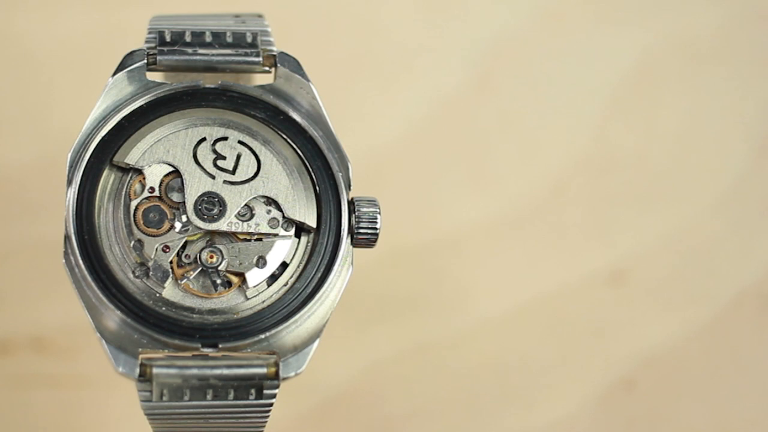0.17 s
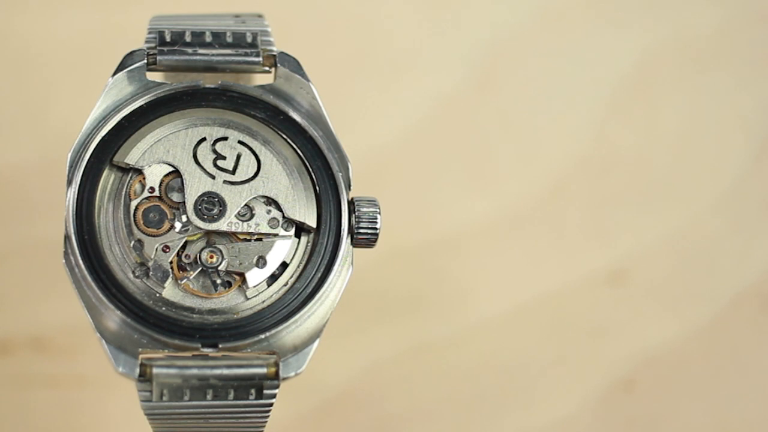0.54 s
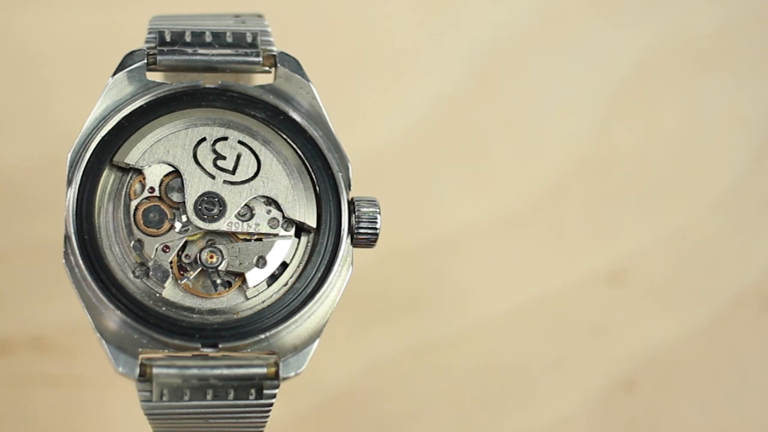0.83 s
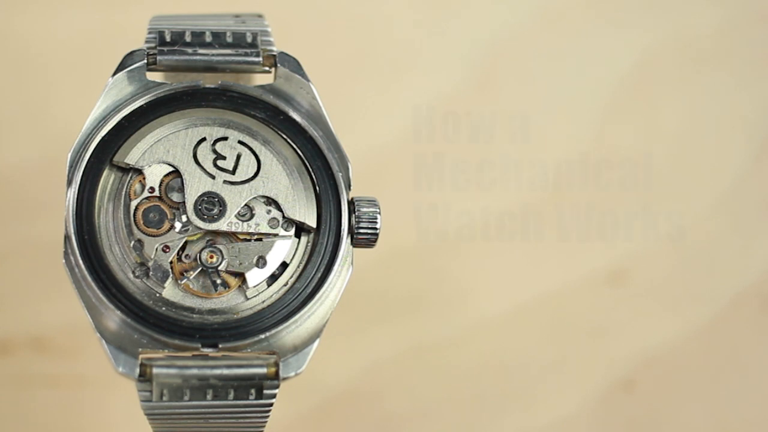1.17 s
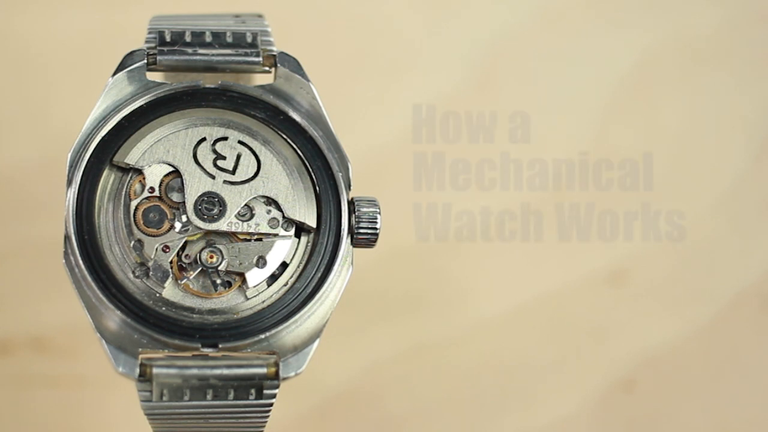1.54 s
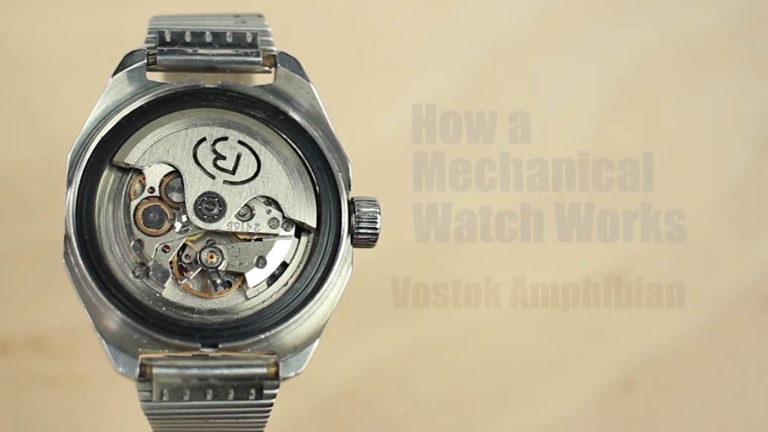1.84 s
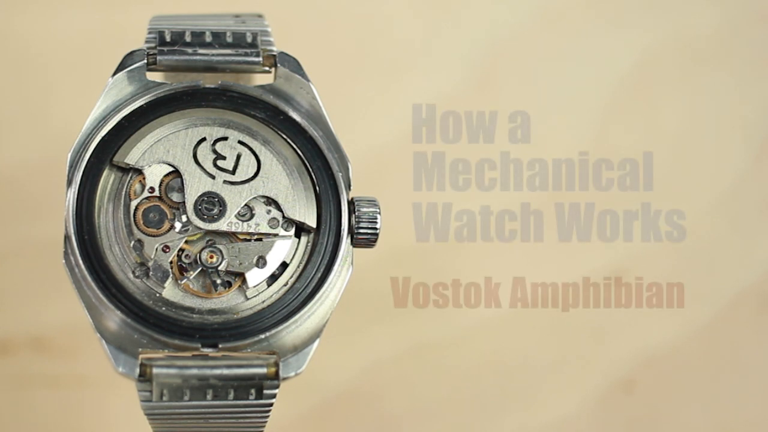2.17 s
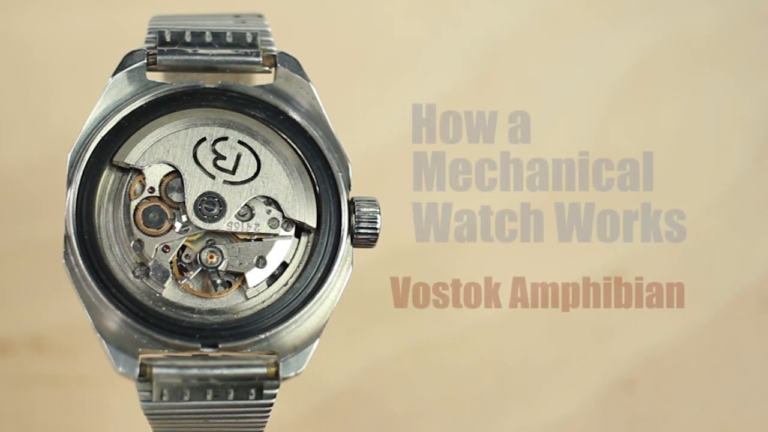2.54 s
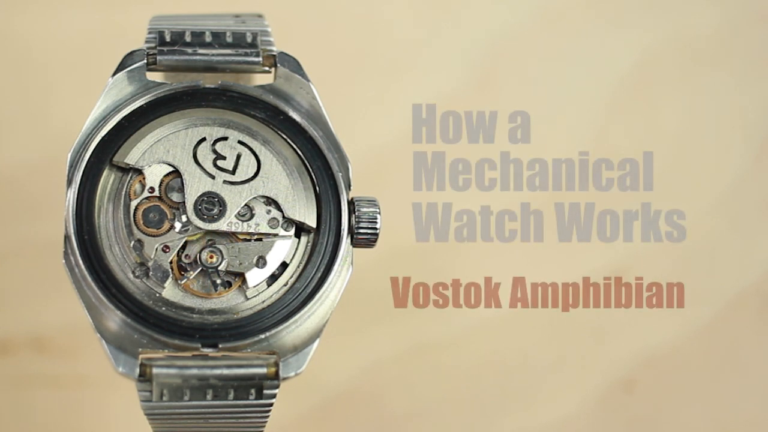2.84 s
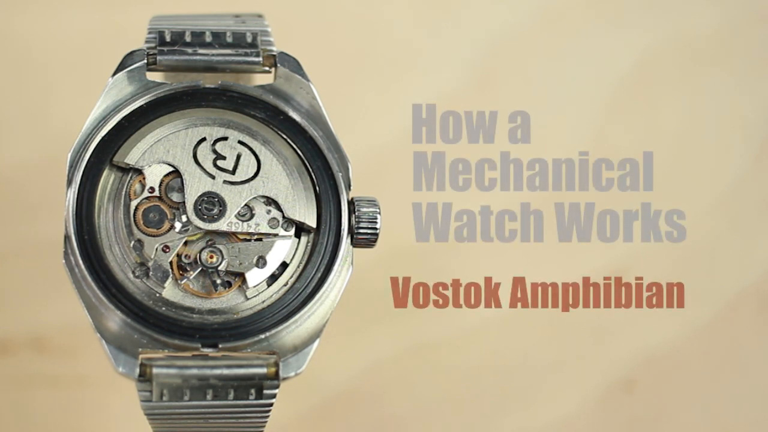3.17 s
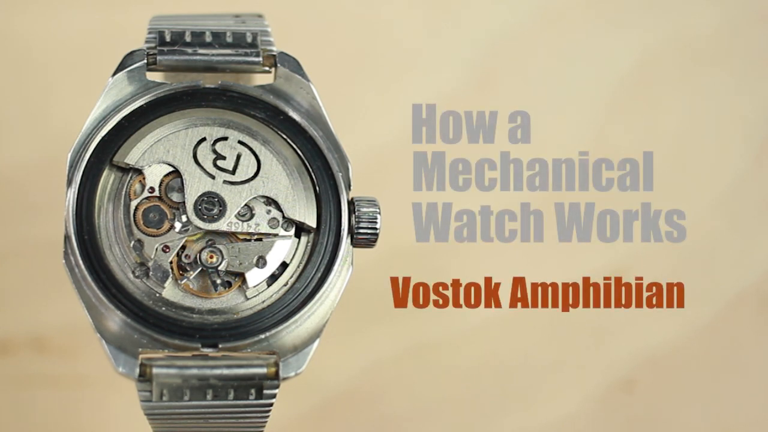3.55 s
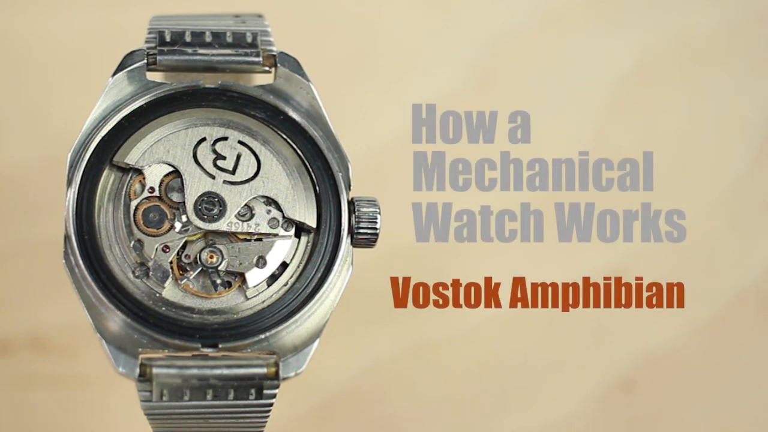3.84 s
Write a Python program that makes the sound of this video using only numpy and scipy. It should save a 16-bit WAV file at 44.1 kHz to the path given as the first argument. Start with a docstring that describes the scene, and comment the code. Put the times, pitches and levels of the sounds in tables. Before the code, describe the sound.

A mechanical wristwatch ticks about five and a half times a second, each tick a tiny light patter ending in a hard bright click; microphone right at the movement, faint hiss, small quiet room.

```python
"""Room with a short tail, microphone right at a mechanical wrist watch: 5.5 beats a second over faint hiss.
Each beat: three light escapement contacts, each a pair of mode bursts, then the hard drop, which rings
the movement and case as decaying modes, with a noise crack, a snap and a rustling tail.
After every second beat the hairspring is touched: paired modes shimmer over a band-noise rattle.
Room: convolution with fading noise. Hiss: shaped noise."""
import sys
import numpy as np
from scipy import signal
from scipy.fft import rfft, irfft
from scipy.io import wavfile

SR = 44100
rng = np.random.default_rng(int(sys.argv[2]) if len(sys.argv) > 2 else 0)


def dump(signal):
    """Clip the signal to [-1, 1] and save it as 16-bit WAV at the path in sys.argv[1]."""
    limited = np.clip(np.atleast_2d(signal).T, -1, 1)
    pcm = np.round(limited * 32767).astype(np.int16)
    wavfile.write(sys.argv[1], SR, pcm)


N = 176400

# Beats, one row each: group_1_db .. group_6_db (movement modes, low to high), light_contacts_db,
# low_ring_db, high_ring_db, then ping_hz, ping_db for each clear ping of the case
BEATS = [(-35, -26, -37, -17, -22, -24, -26, -41.5, -33, 3073, -44.5, 3779, -56.5, 5050.5, -51.5),
         (-24, -52, -30, -23, -18, -27, -33.5, -36.5, -42.5, 3057, -47, 3829, -42.5),
         (-31.5, -22.5, -38, -29, -23.5, -24, -32, -44, -28, 3064, -67, 5781, -58),
         (-48, -64, -40, -34.5, -27, -40, -39.5, -54, -41, 2537, -58, 3038, -58.5),
         (-47, -25.5, -33.5, -22, -9, -32.5, -29, -55.5, -29, 3098.5, -50, 4596.5, -46.5, 5134, -38.5),
         (-13.5, -24, -19.5, -12.5, -23, -41.5, -27.5, -25, -38.5, 2657, -39.5, 5211.5, -38.5, 5833.5, -43.5),
         (-41, -33.5, -26.5, -28, -16.5, -28, -30.5, -42, -30, 2150, -54, 1446, -63),
         (-37.5, -62, -35, -26, -24, -49, -34, -53, -29, 2850, -48, 3160, -61),
         (-38, -21, -20.5, -13.5, -13, -17.5, -23.5, -39.5, -21, 1928.5, -42, 2966, -44.5, 4550.5, -41.5, 5123.5, -34, 3757, -47),
         (-41, -22, -25.5, -24.5, -13.5, -17.5, -38, -47, -33, 2547, -42, 3098, -59.5, 5202, -45, 5850, -42),
         (-38.5, -35, -31, -16.4, -18, -28, -31, -45, -26, 2060, -52.5, 4706, -40.5, 5178, -58),
         (-50, -37, -24, -18, -19, -18.5, -33, -44.5, -26, 2805, -44, 5038, -62),
         (-38, -16, -33, -14.5, -9.5, -21, -26.5, -41.5, -24.5, 3752, -40, 5223, -36, 1381, -62, 5881.5, -54, 2053, -68),
         (-16.5, -21, -22, -15, -18, -20, -29, -23.5, -47, 2483, -55, 2915.5, -36.5, 5263, -40.5, 5720, -39.5),
         (-67, -20, -24, -28, -17, -20.5, -32, -46, -19, 5199, -53),
         (-24, -41, -18.5, -18.5, -19.5, -24, -32, -53, -29.5, 2082, -59, 5264, -62),
         (-31, -21.5, -22, -13.5, -8, -12.5, -27, -35.5, -20.5, 3720.5, -46, 4549.5, -47, 2998, -53.5, 5106.5, -35.5, 2090, -59.5),
         (-16.5, -24, -18, -19, -19, -27.5, -30, -23.5, -26, 2190, -52.5, 2782, -54, 5115, -37, 5793, -36),
         (-25.5, -26.5, -23.5, -12, -13, -37.5, -32.5, -28.5, -49, 3833, -45, 4610, -56, 5221, -46, 1402, -65.5),
         (-34.5, -43, -29.5, -27.5, -29.5, -35, -39, -42.5, -49, 4598, -51, 5104, -53.5),
         (-20.5, -27.5, -18, -16, -4.5, -18, -27.5, -24.5, -30, 2468, -46.5, 3111.5, -48.5, 5238, -40.5, 1345, -59.5),
         (-55, -53, -38.5, -45, -28, -49, -32.5, -60, -48, 2190, -57)]
# Movement modes in six groups, low to high: pitch_hz, t60_s, level_db
MOVEMENT_MODES = [
    [(7150, 0.014, -8.5), (7730, 0.01, -15)],
    [(8240, 0.0066, -6), (8720, 0.0058, -10.5)],
    [(9875, 0.008, -8.5), (10030, 0.0031, -1.5)],
    [(11240, 0.0033, -11), (11613, 0.0092, -3.5), (11800, 0.02, -11.5)],
    [(12850, .004, -9), (13430, 0.0071, -4), (14300, 0.0027, -6.5)],
    [(15200, 0.0092, -1.5), (15900, 0.0049, -16.5)],
]
# Colour of the three light contacts, one row each: group_1_db .. group_6_db
CONTACT_COLOUR_DB = [
    [-17, -18.5, -9.5, -10.5, -8, -14],
    [-22, -24.5, -17, -6.5, -7, -21.5],
    [-20, -18, -15.5, -8, -9.5, -17],
]
# Contact bursts, two per light contact: lead_s before the drop
CONTACT_LEAD_S = [.0123, .0112, .0071, .0062, .0028, .0019]
# Contact bursts: level_db relative to the beat's light_contacts_db
CONTACT_DB = [1.5, -3, -3.5, -1.5, 6.5, 3]
# Clear rings, pitch creeping as the escape wheel turns: pitch_at_0_s_hz, creep_hz_per_s, t60_s
RINGS = [(7577, -18, 0.029), (9760, 36, 0.052)]
# Rustle band of each movement group: low_hz, high_hz
RUSTLE_BANDS_HZ = [(6900, 7900), (8000, 9200), (9200, 10600), (10800, 12500), (12400, 14600),
                   (14600, 15900)]
# Rustle of each movement group: level_db
RUSTLE_DB = [-44, -41, -46, -46.5, -49, -49.5]
# Hairspring touches: start_s, low_modes_db, middle_modes_db, high_modes_db
TOUCHES = [(0.396, -52.5, -55.5, -55.5), (0.761, -58, -67, -56.5), (1.124, -56, -45.5, -55),
           (1.4878, -56.5, -68, -57), (1.8497, -55.5, -65, -52), (2.2146, -54, -64.5, -49),
           (2.578, -54.5, -50, -51), (2.9401, -57, -55.5, -54), (3.3046, -53, -50, -51),
           (3.6679, -56.5, -67, -62)]
# Hairspring modes in three groups, low to high: pitch_hz, t60_s, level_db
SPRING_MODES = [
    [(3720, 0.13, -10), (3972, 0.15, -2), (4232, 0.15, -10.5), (4515, 0.18, -8.5), (4800, .15, -14),
     (5092, 0.12, -8.5), (5385, 0.14, -18), (5740, .1, -15)],
    [(6675, 0.072, -12), (7056, 0.12, 3.5), (7700, 0.13, -5.5), (7950, 0.07, -15)],
    [(11610, 0.12, -10), (12070, 0.05, -7), (13800, 0.07, -1), (14260, .055, 0), (14470, .05, 3.5),
     (15160, .045, 4)],
]
# Hiss spectrum: frequency_hz, relative_level_db (per Hz)
HISS_SPECTRUM = [(25, -14.5), (55, 6.5), (95, 1), (150, 1.5), (300, -2), (1000, -4.5), (4000, -5.5),
                 (7500, -6.5), (15800, -7), (16050, -33)]

FIRST_S, PERIOD_S, BEAT_ERROR_S = .1809, .181735, .0008  # every second beat is early by the error
SCATTER_DB, RISE_S = 2.5, 0.00069
DROP_DETUNE_RATIO, DROP_PHASE_TURNS = 0.0021, .45
CONTACT_MAX_T60_S, CONTACT_RISE_S, CONTACT_JITTER_S = 0.015, .0002, .0003
CONTACT_DETUNE_RATIO = 0.014
LIGHT_FOLLOWS = 0.65  # share of the drop's colour that the light contacts take on
PING_T60_S, PING_RISE_S, PING_DELAY_S = 0.016, 0.0018, 0.000511
PING_LIGHT_DB = -17  # pings at the light contacts
PING_TAIL_COPIES, PING_TAIL_DB, PING_TAIL_T60_S, PING_SPREAD_HZ = 9, -27.5, 0.27, 80
CRACK_DB, CRACK_DECAY_S, CRACK_HZ = -29.5, 0.00056, (7000, 15600)
SNAP_DB, SNAP_HZ = -20.5, (1400, 6000)
BODY_DB, BODY_DECAY_S, BODY_HZ = -33, .003, (2600, 8900)
RUSTLE_T60_S, RUSTLE_BEND = 0.19, 1.19  # bend above 1: holds, then falls faster
RUSTLE_FOLLOWS = 0.61  # share of a group's dB that its rustle follows
RUSTLE_EARLY_DB, RUSTLE_PATCHY_DB = 2, 1.5  # early: from the first contact to the drop
SPRING_SCATTER_DB, SPRING_PHASE_TURNS, SPRING_SPLIT_RATIO, SPRING_RISE_S = 5, 0.12, 0.0029, .0003
SPRING_PAIR_DB = -6.5  # on each mode of a pair
SPRING_RATTLE_DB, SPRING_RATTLE_T60_S, SPRING_RATTLE_HZ = -9.5, 0.078, (3570, 5740)
ROOM_T60_S, ROOM_RISE_S, ROOM_DB = 0.11, .012, -31.5
HISS_DB = -68  # rms, ahead of the top cut
START_S, FADE_IN_S, TOP_HZ = 0.1508, 0.00092, 16750
MODE_LENGTH_MAX_S, MODE_LEAD_SAMPLES = .13, 300


def beats():
    """The escapement: per beat, light contacts that excite the movement faintly, then the drop."""
    out = np.zeros(N)
    modes = flat(MOVEMENT_MODES)
    crack_noise, snap_noise, body_noise = band(*CRACK_HZ), band(*SNAP_HZ), band(*BODY_HZ)
    rustle_noise = patchy_rustle()
    for k, row in enumerate(map(np.array, BEATS)):
        at = FIRST_S + k * PERIOD_S - k % 2 * BEAT_ERROR_S
        mix_db, light_db, ring_db = row[:6], row[6], row[7:9]
        ping_hz, ping_db = row[9::2], row[10::2]
        light_contacts(out, at, modes, mix_db, light_db, ping_hz, ping_db)
        drop(out, at, modes, mix_db, ring_db)
        case_pings(out, at, ping_hz, ping_db)

        i = slice(int(at * SR) - 700, int(at * SR) + 7000)
        since = np.arange(N)[i] / SR - at
        click = np.exp(-np.abs(since) / CRACK_DECAY_S)
        body = undb(BODY_DB) * (since > 0) * np.exp(-np.abs(since) / BODY_DECAY_S)
        out[i] += undb(max(mix_db) + CRACK_DB) * click * crack_noise[i]
        out[i] += rustle_fade(since) * (undb(RUSTLE_FOLLOWS * mix_db) @ rustle_noise[:, i])
        out[i] += undb(light_db) * (undb(SNAP_DB) * click * snap_noise[i] + body * body_noise[i])
    return out


def drop(out, at, modes, mix_db, ring_db):
    """The hard drop: movement modes in the beat's own mix, plus two rings of creeping pitch."""
    hz, t60, db, group = modes
    detuned_hz = hz * (1 + DROP_DETUNE_RATIO * rng.standard_normal(len(hz)))
    add(out, at, detuned_hz, t60, db + mix_db[group], RISE_S, DROP_PHASE_TURNS)
    ring_hz, creep_hz_per_s, ring_t60 = np.array(RINGS).T
    add(out, at, ring_hz + creep_hz_per_s * at, ring_t60, ring_db, RISE_S)


def light_contacts(out, at, modes, mix_db, light_db, ping_hz, ping_db):
    """Faint early contacts: the same modes, detuned and shortened, with faint case pings."""
    hz, t60, db, group = modes
    colours_db = np.repeat(CONTACT_COLOUR_DB, 2, axis=0)
    drop_colour_db = LIGHT_FOLLOWS * (mix_db - mix_db.mean())
    for lead, contact_db, colour_db in zip(CONTACT_LEAD_S, CONTACT_DB, colours_db):
        touch = at - lead + CONTACT_JITTER_S * rng.standard_normal()
        detune, scatter = rng.standard_normal((2, len(hz)))
        level_db = db + (colour_db + drop_colour_db)[group] + light_db + contact_db + SCATTER_DB * scatter
        add(out, touch, hz * (1 + CONTACT_DETUNE_RATIO * detune), np.minimum(t60, CONTACT_MAX_T60_S),
            level_db, CONTACT_RISE_S)
        add(out, touch, ping_hz, np.full(len(ping_hz), PING_T60_S),
            ping_db + PING_LIGHT_DB + contact_db, PING_RISE_S)


def case_pings(out, at, ping_hz, ping_db):
    """Case modes: short pings, then a weaker tail of longer modes scattered around each."""
    add(out, at + PING_DELAY_S, ping_hz, np.full(len(ping_hz), PING_T60_S), ping_db, PING_RISE_S)
    near_hz = np.tile(ping_hz, PING_TAIL_COPIES)
    near_hz = near_hz + PING_SPREAD_HZ * rng.standard_normal(len(near_hz))
    tail_db = np.tile(ping_db, PING_TAIL_COPIES) + PING_TAIL_DB
    add(out, at, near_hz, np.full(len(near_hz), PING_TAIL_T60_S), tail_db, PING_RISE_S)


def patchy_rustle():
    """One noise band per movement group, its level wandering at 30 to 250 Hz."""
    rows = []
    for (lo_hz, hi_hz), db in zip(RUSTLE_BANDS_HZ, RUSTLE_DB):
        level = undb(db + RUSTLE_PATCHY_DB * band(30, 250))
        rows.append(level * band(lo_hz, hi_hz))
    return np.array(rows)


def rustle_fade(since):
    """Rustle level: constant from the first contact to the drop, then a bent decay in dB."""
    early = (since > -max(CONTACT_LEAD_S)) * undb(RUSTLE_EARLY_DB)
    late = undb(-60 * (np.abs(since) / RUSTLE_T60_S) ** RUSTLE_BEND)
    return np.where(since > 0, late, early)


def hairspring():
    """Slowly fading modes that start nearly in step, each a beating pair, over a grainy rattle."""
    out, rattle, t = np.zeros(N), band(*SPRING_RATTLE_HZ), np.arange(N) / SR
    hz, t60, db, group = flat(SPRING_MODES)
    for at, *mix_db in TOUCHES:
        for _ in range(2):
            split, scatter = rng.standard_normal((2, len(hz)))
            level_db = db + np.array(mix_db)[group] + SPRING_PAIR_DB + SPRING_SCATTER_DB * scatter
            add(out, at, hz * (1 + SPRING_SPLIT_RATIO * split), t60, level_db,
                SPRING_RISE_S, SPRING_PHASE_TURNS)
        since = np.maximum(t - at, 0)
        rattle_db = mix_db[0] + SPRING_RATTLE_DB - 60 * since / SPRING_RATTLE_T60_S
        out += (t > at) * undb(rattle_db) * rattle
    return out


def room(x):
    """Diffuse tail: convolution with noise that swells, then decays exponentially."""
    t = np.arange(SR // 3) / SR
    envelope = np.exp(-np.log(1000) * t / ROOM_T60_S) * (1 - np.exp(-t / ROOM_RISE_S))
    tail = rng.standard_normal(len(t)) * envelope
    return signal.fftconvolve(x, tail * undb(ROOM_DB) / np.sqrt(np.sum(tail ** 2)))[:N]


def hiss():
    """Steady microphone hiss with a little rumble: white noise shaped in the spectrum."""
    f = np.maximum(np.arange(N // 2 + 1) * SR / N, 1)
    hz, db = np.array(HISS_SPECTRUM).T
    shape = undb(np.interp(np.log(f), np.log(hz), db))
    x = irfft(rfft(rng.standard_normal(N)) * shape, N)
    return x * undb(HISS_DB) / np.std(x)


def add(out, at, hz, t60, db, rise, turns=1):
    """Adds modes: Gaussian swell to a peak at `at`, exponential decay, phases over `turns` of a cycle."""
    first = int(at * SR) - MODE_LEAD_SAMPLES
    length = int(min(max(t60), MODE_LENGTH_MAX_S) * SR) + MODE_LEAD_SAMPLES
    i = np.arange(first, min(first + length, N))
    t = i / SR - at
    hz, t60, db = (np.asarray(v, float)[:, None] for v in (hz, t60, db))
    swell = np.exp(-.5 * (t / rise) ** 2)
    decay = np.exp(-np.log(1000) * np.maximum(t, 0) / t60)
    tone = np.cos(2 * np.pi * (hz * t + turns * rng.random(hz.shape)))
    out[i] += np.sum(undb(db) * np.where(t < 0, swell, decay) * tone, axis=0)


def flat(groups):
    """Columns of a grouped mode table, then the group index of each mode."""
    columns = np.array(sum(groups, [])).T
    return (*columns, np.repeat(np.arange(len(groups)), [len(g) for g in groups]))


def band(lo_hz, hi_hz):
    """Band-passed noise of rms 1."""
    sos = signal.butter(3, [lo_hz, min(hi_hz, 20000)], "band", fs=SR, output="sos")
    x = signal.sosfilt(sos, rng.standard_normal(N))
    return x / np.std(x)


def undb(db):
    """Amplitude ratio of a level in dB."""
    return 10 ** (np.asarray(db) / 20)


def scene():
    """Watch, its room tail and the hiss, one channel."""
    watch = beats() + hairspring()
    return (watch + room(watch) + hiss())[None]


def record(dry):
    """Silence up to START_S, a quick fade-in, and a steep low-pass at TOP_HZ."""
    on = np.clip((np.arange(N) / SR - START_S) / FADE_IN_S, 0, 1)
    return signal.sosfilt(signal.ellip(8, .2, 70, TOP_HZ, fs=SR, output="sos"), dry * on)


dry = scene()
out = record(dry)
dump(out)
```